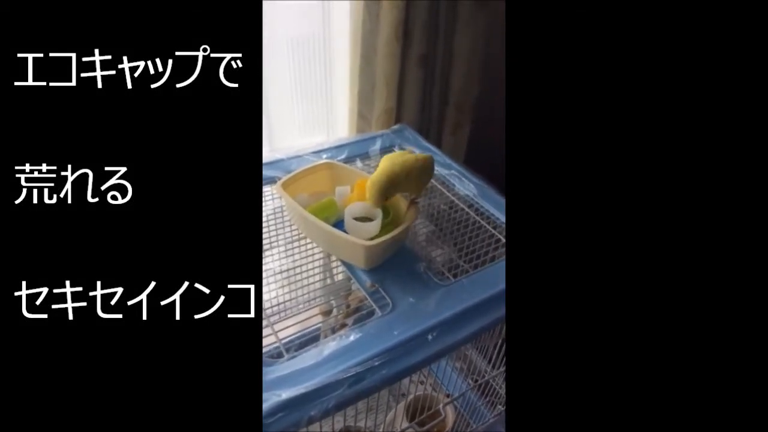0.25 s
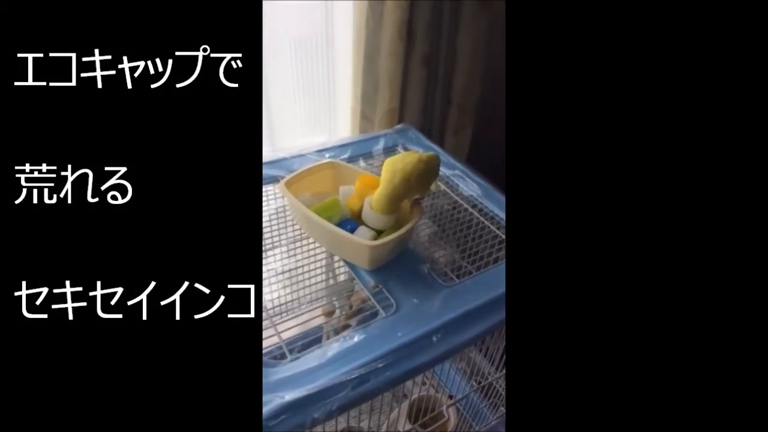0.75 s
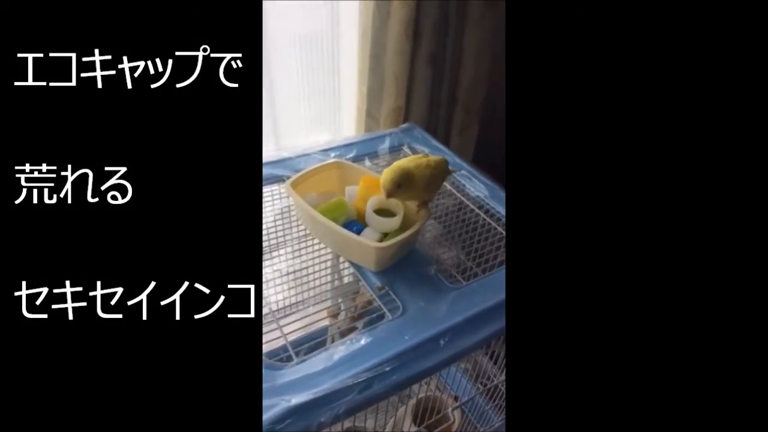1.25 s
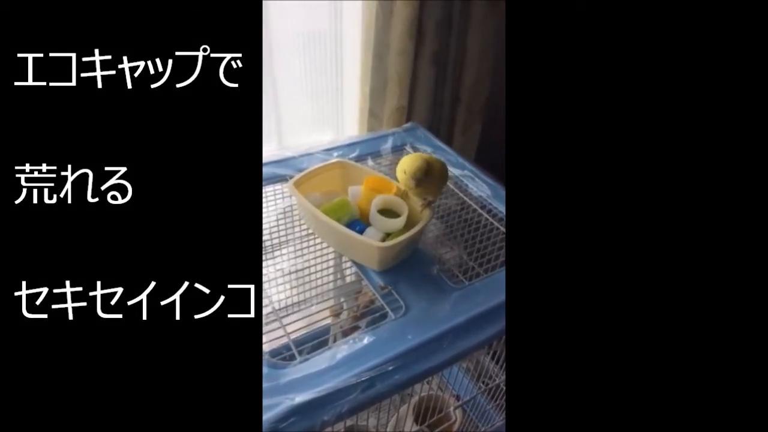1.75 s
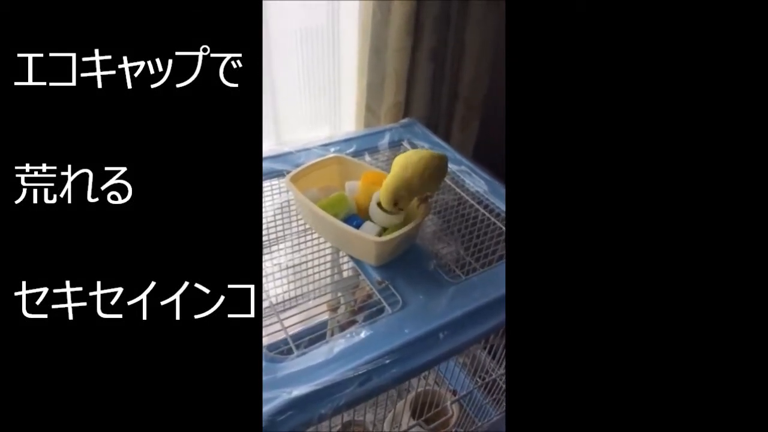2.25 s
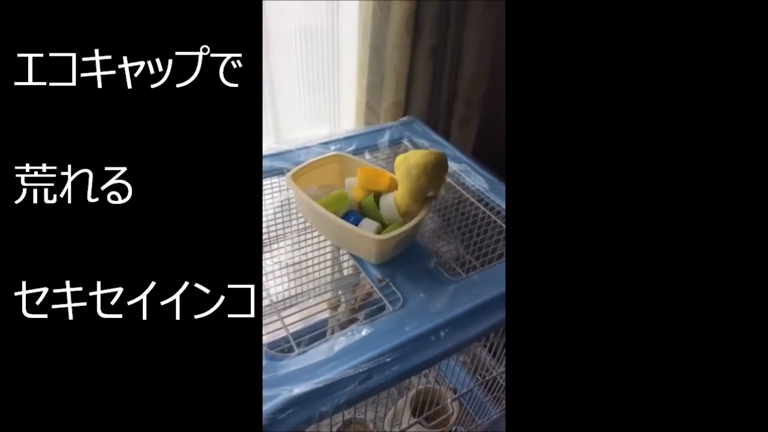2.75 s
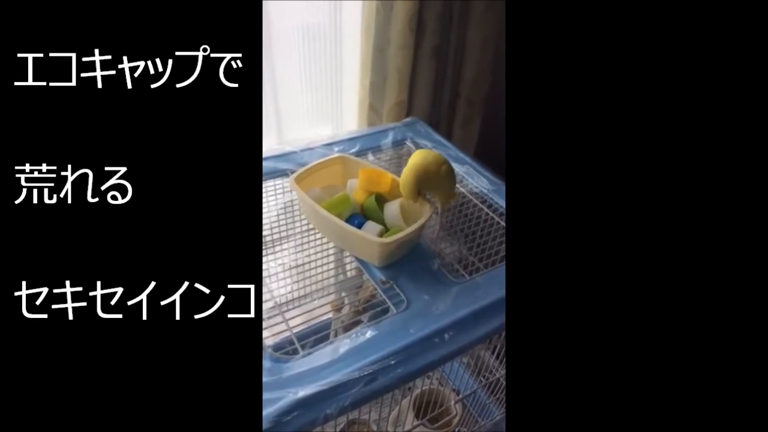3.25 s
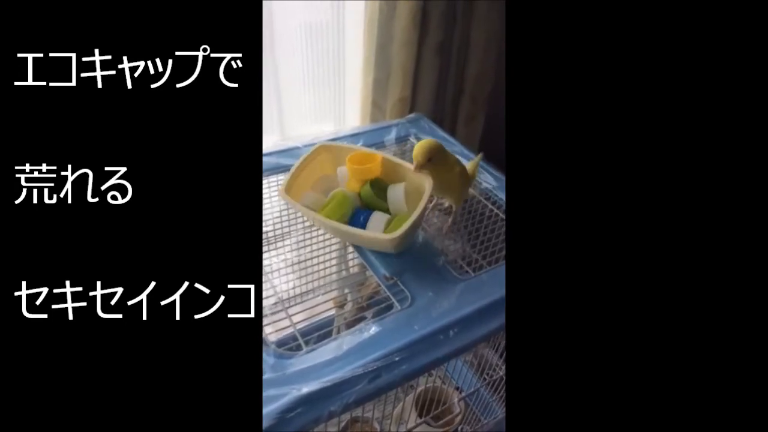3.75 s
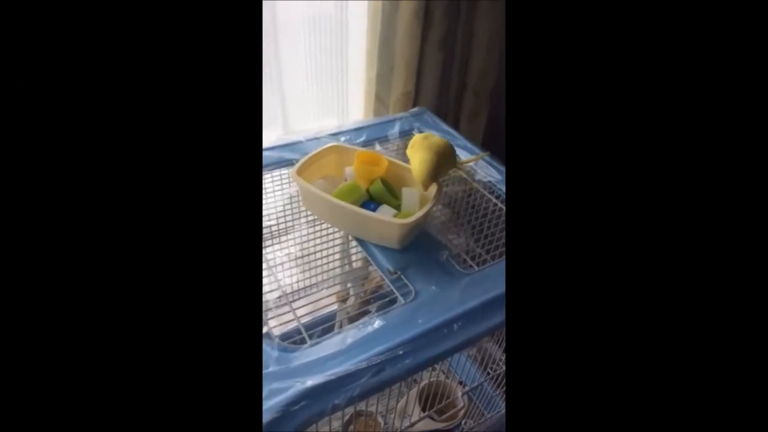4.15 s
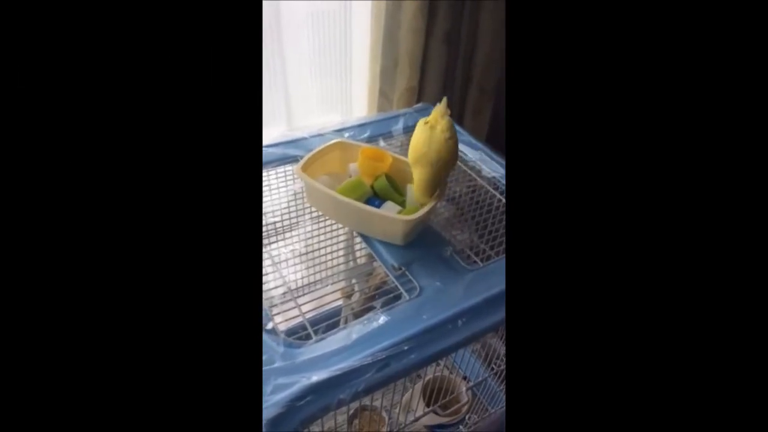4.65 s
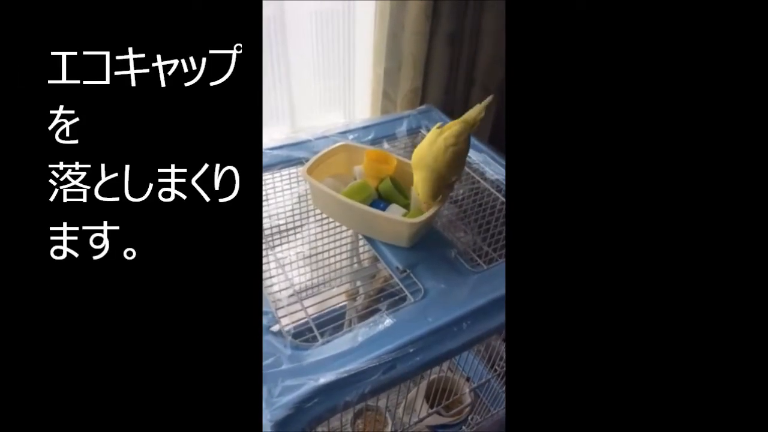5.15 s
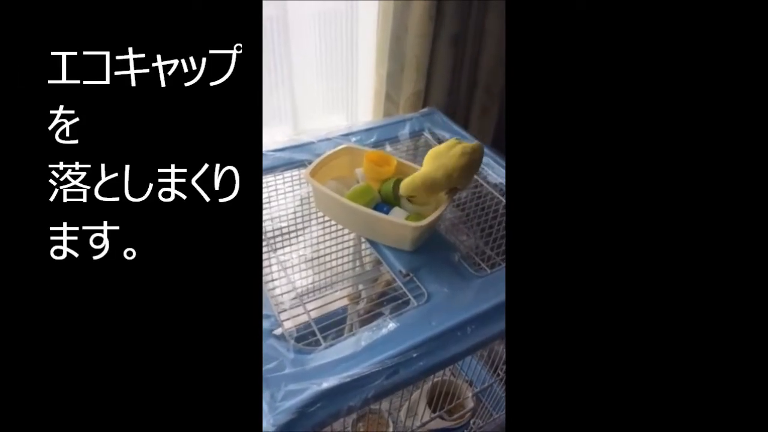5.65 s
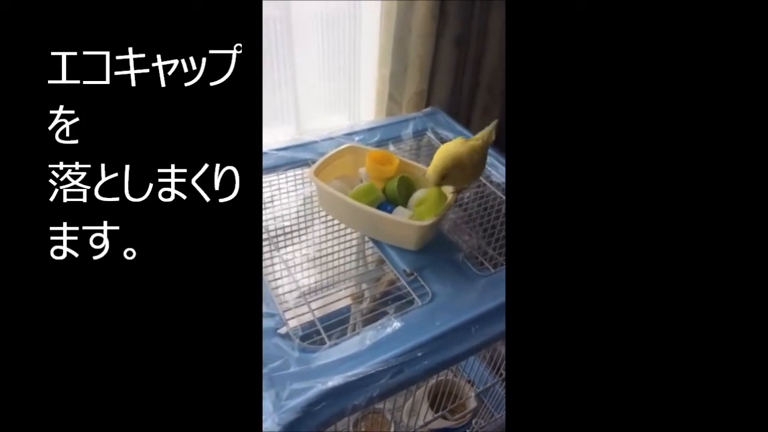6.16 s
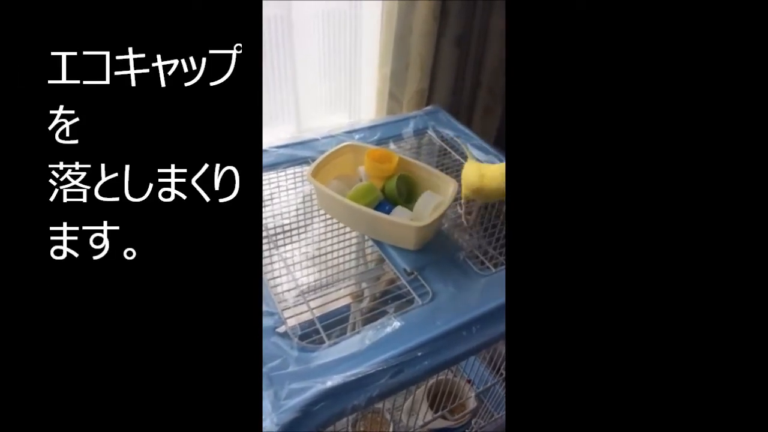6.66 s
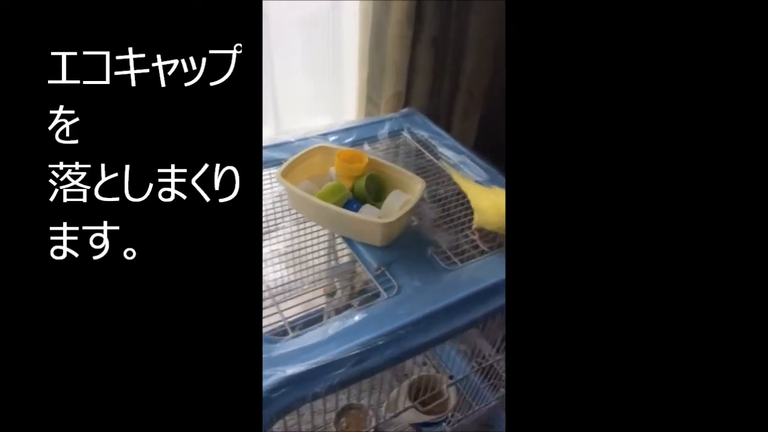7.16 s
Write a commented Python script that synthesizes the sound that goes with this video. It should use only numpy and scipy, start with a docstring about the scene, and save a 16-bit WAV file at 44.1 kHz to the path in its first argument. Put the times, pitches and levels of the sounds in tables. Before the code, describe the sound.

Hard plastic bottle caps click, rattle and scrape irregularly in a plastic dish on a wire cage as a small bird rummages, in a quiet room.

```python
"""A budgie on the rim of a plastic dish rummages through plastic bottle caps with beak and claws.
Clicks are noise cracks with short cap modes, split into body, edge and tick; sliding caps are streams
of tiny contacts. Tapped crowns pop as resonated noise. The dish, on a wire cage in a small room, knocks
on the cage top in ringing modes. There is one deep bump, and once the wires chatter under the dish.
Random echo paths make the room, and coloured noise its still air."""
import sys
import numpy as np
from scipy import signal
from scipy.fft import rfft, irfft
from scipy.io import wavfile
from scipy.ndimage import uniform_filter1d

SR = 44100
rng = np.random.default_rng(int(sys.argv[2]) if len(sys.argv) > 2 else 0)


def waveform_to_disk(signal):
    """Save audio, clipped to [-1, 1], as 16-bit WAV at the path in sys.argv[1]."""
    frames = np.transpose(np.atleast_2d(signal))
    scaled = np.clip(frames, -1, 1) * 32767
    samples = np.round(scaled).astype(np.int16)
    wavfile.write(sys.argv[1], SR, samples)


N = 325899  # length in samples
TIME = np.arange(N) / SR

# Levels in these tables are relative: layer gains and random variation are added later.
# The clearest contacts of beak, claws, caps and dish.
# Each row: start in seconds, strength in dB, body pitch in Hz, hardness in dB.
CONTACTS = [(0.143, -23.5, 1080, -5.5), (0.164, -41, 1450, -4.5), (0.455, -78.5, 1170, 13.5),
            (0.524, -66, 805, 2.5), (0.626, -29.5, 1020, -5.5), (0.636, -37, 1080, -2),
            (0.642, -40, 770, -2.5), (0.921, -51, 1950, -13), (1.036, -43.5, 1080, -14.5),
            (1.104, -48.5, 1120, -11.5), (1.615, -64, 1650, -3), (1.709, -52.5, 1550, -15),
            (1.721, -54.5, 2110, -1), (1.751, -50.5, 2450, -2), (2.358, -49, 880, -14),
            (2.562, -39, 1120, -7), (2.658, -49, 1580, -6.5), (2.802, -44, 1700, -14),
            (2.825, -43.5, 1180, -16), (2.93, -52.5, 1710, -19), (3.019, -53.5, 1570, -3.5),
            (3.063, -44, 1720, -2), (3.124, -52.5, 1900, 4), (3.155, -51.5, 1660, -8),
            (3.429, -48.5, 1290, -3.5), (3.456, -58, 1150, 3.5), (3.712, -44.5, 1314, -5.5),
            (3.932, -35, 870, -3.5), (3.949, -25.5, 1640, -6), (3.958, -33, 1440, -2),
            (3.971, -31.5, 1600, -2.5), (3.987, -34, 1490, -2.5), (4.011, -33, 1710, -8.5),
            (4.057, -38.5, 1360, -8), (4.085, -61, 1250, 13.5), (4.111, -36.5, 1210, -5),
            (4.183, -45.5, 955, -29), (4.297, -45, 1870, 2), (4.324, -44, 1420, -21),
            (4.427, -63.5, 1520, 7.5), (4.735, -65.5, 1630, 1), (4.913, -47.5, 1520, -8),
            (4.981, -64, 1550, 5), (5.064, -56, 1170, -9.5), (5.119, -58.5, 1100, -9.5),
            (5.194, -64, 1500, 1), (5.256, -60, 1170, -5), (5.353, -38.5, 1890, -8),
            (5.659, -44.5, 1130, -20), (5.686, -44, 1220, -4.5), (5.808, -41, 1670, -8),
            (5.897, -40.5, 1670, -10.5), (5.921, -34, 920, -1), (5.988, -33.5, 1280, -9.5),
            (6.245, -34, 930, -9), (6.514, -60, 1400, 3), (6.552, -48.5, 1570, 2.5),
            (6.636, -44, 1540, -19), (6.76, -54.5, 1410, -1), (6.801, -48.5, 1450, -0.5),
            (6.982, -54, 1480, 0), (7.095, -55, 1360, -0.5), (7.258, -31.5, 1510, -1.5),
            (7.266, -31.5, 680, -27), (7.291, -36.5, 960, -4.5)]
# The dish drops back on the cage top.
# Each row: start in seconds, thud level in dB, lowest pitch it stirs in Hz, wire ring level in dB.
DISH_DROPS = [(0.145, -46, 198, -63), (0.627, -45, 230, -51), (3.949, -38.5, 160, -37.5),
              (3.974, -38.5, 140, -52), (4.012, -39, 136, -47), (5.921, -35, 220, -62),
              (6.210, -35, 108, -34.5), (6.245, -41, 127, -33), (7.259, -34.5, 320, -34)]
# A cap tapped on its crown pops at the pitch of its hollow.
# Each row: start in seconds, pitch in Hz, level in dB.
CROWN_TAPS = [(0.048, 3500, -68), (0.617, 2520, -33), (0.92, 2760, -53), (1.721, 2830, -44.5),
              (1.752, 2970, -45.5), (3.933, 3240, -29)]
# The bird shoves a cap across the others.
# Each row: start in seconds, length in seconds, strength in dB, scratchiness in dB.
CAP_SHOVES = [(0, 0.023, -51.5, 1.5), (0.125, .03, -56, 0), (0.603, 0.058, -44.5, -13),
              (0.687, 0.061, -52.5, -13), (0.808, 0.057, -58, -12), (0.93, .18, -55, -20),
              (2.759, 0.11, -54.5, -12.5), (3.42, 0.062, -57, -7), (3.897, 0.079, -45, 0.5),
              (3.947, .18, -39.5, -9.5), (5.356, 0.06, -48, -10), (5.647, 0.075, -45.5, -8.5),
              (5.806, 0.021, -41.5, -12.5), (5.887, 0.1196, -41.5, -17), (6.634, 0.03, -54.5, 4.5),
              (7.237, .09, -49.5, 2)]
# How busily the bird stirs the caps and scratches with its claws.
# Each row: time in seconds, stirring effort in dB, scratching effort in dB.
BUSYNESS = [(0, -54.5, -66), (0.38, -61, -74.5), (0.5, -71, -79), (0.8, -65, -69.5), (1.02, -59.5, -70),
            (1.31, -58.5, -77.5), (1.36, -80, -86.5), (2.28, -81, -87), (2.35, -58, -69.5),
            (3.08, -60, -67), (3.28, -68, -69.5), (3.85, -61.5, -62), (4.5, -75, -79.5),
            (5.3, -70.5, -73.5), (5.45, -63, -69.5), (6.1, -59.5, -67.5), (6.75, -59.5, -62),
            (6.97, -77.5, -76)]
# Modes of the caps in the dish. Each row: pitch in Hz, level in dB, t60 in seconds.
CAP_MODES = [(641, -2.5, 0.067), (810, 1.5, 0.05), (1023, -14, 0.016), (1230, 0, 0.041), (1634, 5, 0.02),
             (1850, -11.5, 0.061), (2058, 3.5, 0.031), (3060, -42, 0.015), (3472, -1.5, 0.074),
             (3917, 13, 0.014), (4510, -1.5, 0.069), (5800, 14, 0.0042), (6850, -13, 0.01),
             (8340, 8, 0.013), (10200, -15, 0.0042), (11300, -3, .007)]
# Modes of the dish on the cage top. Each row: pitch in Hz, level in dB, t60 in seconds.
DISH_MODES = [(145.3, -13, 0.48), (181.6, -12, 0.52), (230.7, -13, 0.15), (270, -9, 0.17), (344, -7.5, 0.3),
              (433, -15, 0.11), (562, -3, 0.11), (625, 6.5, 0.019), (790, 2, 0.089)]
# Modes of the cage wires. Each row: pitch in Hz, level in dB, t60 in seconds.
WIRE_MODES = [(1713, -1.5, 0.052), (2150, -36, 0.088), (3155, 1.5, 0.19), (3350, -27.5, 0.15),
              (4620, 4, 0.18), (5230, -10, 0.15), (6220, 1, 0.17), (7440, -16, 0.084), (7570, 15, 0.11),
              (9160, 2, 0.16), (11400, 0, .11)]
# Colour of the crack at each contact. Each row: frequency in Hz, level in dB.
CRACK_COLOUR = [(100, 2), (400, 1), (800, -5), (1900, -5.5), (2600, -5), (4500, -7), (8000, -6.5),
                (11000, -11), (15500, -19)]
# Colour of wire striking wire. Each row: frequency in Hz, level in dB.
BUZZ_COLOUR = [(300, 2), (800, 6), (2000, -0.5), (4500, 3), (8000, -1.5), (9800, -5.5), (11500, -5),
               (12800, -17), (15500, -18)]
# Colour of the still room air. Each row: frequency in Hz, relative density in dB per Hz.
AIR_COLOUR = [(22, -32), (55, -3), (90, 1), (170, -4.5), (270, -3), (550, -11), (1400, -24.5),
              (2100, -24.5), (3000, -29.5), (6000, -29.5), (8500, -26.5), (14500, -35)]
# Decay of the room tail. Each row: frequency in Hz, t60 in seconds.
ROOM_DECAY = [(200, 0.86), (600, 0.33), (1400, 0.32), (3700, 0.33), (8000, 0.31), (14000, 0.25)]

# upper edges of the hollow body, of the hard edge and of the whole sound
BODY_TOP_HZ, EDGE_TOP_HZ, CUTOFF_HZ = 2500, 6000, 15550
# a harder contact is brighter: dB gained per dB of hardness, and level in dB at hardness 0
EDGE_PER_DB, EDGE_DB = 1.12, 0.04
TICK_PER_DB, TICK_DB = 1.48, -0.9
# sliding, claw scratches and light pecks, in dB above the bird's effort
SLIDE_DB, SCRATCH_DB, PECK_DB = -1.27, 0.56, -3
SLIDE_HZ = 1280  # hollow pitch of sliding caps
# the dish skids: a quick build-up while it slides, then a drop and a dying rattle
SKID_AT_S, SKID_S, SKID_RISE_S, SKID_DB = 6.195, 0.045, 0.03, -30
RATTLE_DB, RATTLE_T60 = -5, 0.48
CHATTER_S = .25  # skid and rattle together
AIR_DB = -65.5
LEVEL_SAMPLES = 265  # a blow is levelled on its first 6 ms


def amp(db):
    """Decibels to gain."""
    return 10 ** (np.asarray(db) / 20)


def unit(x, count=None):
    """Scales to rms 1, judged on the first count samples."""
    return x / np.sqrt(np.mean(x[:count] ** 2) + 1e-20)


def read(points, hz):
    """Reads a table on a log-frequency axis."""
    f, value = np.transpose(points)
    return np.interp(np.log(hz + 1), np.log(f), value)


def add(mix, s, sound):
    """Mixes a sound in at time s."""
    part = mix[max(round(s * SR), 0):][:len(sound)]
    part += sound[:len(part)]


def noise(spectrum, size):
    """Noise of a given colour, rms 1."""
    white = rfft(rng.standard_normal(size))
    gain = amp(read(spectrum, np.fft.rfftfreq(size, 1 / SR)))
    return unit(irfft(white * gain, size))


def band(x, hz, kind):
    """Causal low-, high- or band-pass."""
    return signal.sosfilt(signal.butter(4, hz, kind, fs=SR, output="sos"), x)


def resonance(x, hz, q):
    """A broad hollow resonance."""
    return signal.lfilter(*signal.iirpeak(hz, max(q, .5), fs=SR), x)


def fade(t, t60):
    """Falls 60 dB in t60 seconds."""
    return np.exp(-np.log(1000) * t / np.maximum(t60, 1e-3))


def ring(modes, size, detune, uneven_db):
    """One blow: where it lands decides how strongly each mode speaks, and shifts it a little."""
    hz, db, t60 = np.transpose(modes)[:, :, None]
    shift, strength, side = rng.standard_normal((3, len(modes), 1))
    t = np.arange(size) / SR
    level = np.sign(side) * amp(db + uneven_db * strength)
    tone = np.sin(2 * np.pi * hz * np.exp(detune * shift) * t)
    return (level * fade(t, t60) * tone).sum(0)


def grains(per_s, spread_db, size=N):
    """A random train of tiny impulses of uneven size."""
    height = amp(spread_db * np.minimum(rng.exponential(1, size), 3.5))
    sign = rng.choice([-1, 1], size)
    return height * sign * (rng.random(size) < per_s / SR)


def still_air():
    """Still room air: steady coloured noise."""
    return amp(AIR_DB) * noise(AIR_COLOUR, size=N)


def effort(s, column=1):
    """How busy the bird is at time s, in dB: stirring (column 1) or scratching (column 2)."""
    curve = np.transpose(BUSYNESS)
    return np.interp(s, curve[0], curve[column])


def contact(crack_db=1, crack_t60=0.016, rattle_db=-19, rattle_t60=0.17,
            skip_db=-7, skip_s=.003, count=2):
    """A crack, the short ring of a cap and a shiver of its neighbours; the edge skips as it lands."""
    size = 3072
    t = np.arange(size) / SR
    crack = noise(CRACK_COLOUR, size) * (fade(t, crack_t60) + amp(rattle_db) * fade(t, rattle_t60))
    cap = unit(ring(CAP_MODES, size, detune=0.06, uneven_db=2.5), LEVEL_SAMPLES)
    blow = cap + amp(crack_db) * unit(crack, LEVEL_SAMPLES)
    out = blow.copy()
    for delay, strength in rng.random((count, 2)):
        add(out, delay * skip_s, amp(skip_db) * strength * blow)
    # plastic gives a little before it bites
    return out * (1 - fade(t, .003))


def shuffles(lurch_db=7.0, body_q=1.0, count=8):
    """Sliding caps stick and slip: streams of tiny contacts follow the effort and swell at each shove."""
    slips, scratches = np.zeros((2, N))
    for _ in range(count):
        cap = contact()
        # each cap lurches in its own time
        drift = uniform_filter1d(uniform_filter1d(rng.standard_normal(N), 900), 900)
        lurch = amp(lurch_db * np.clip(unit(drift), -2, 2))
        slips += signal.oaconvolve(lurch * grains(per_s=55, spread_db=3.5), cap)[:N]
        scratches += signal.oaconvolve(lurch * grains(per_s=35, spread_db=2.2), cap)[:N]
    hollow = band(slips + scratches, [560, 3000], "band")
    slips = unit(resonance(hollow, SLIDE_HZ, body_q))
    scratches = unit(band(scratches, BODY_TOP_HZ, "high"))
    out = amp(effort(TIME) + SLIDE_DB) * slips
    out += amp(effort(TIME, column=2) + SCRATCH_DB) * scratches
    for start, length, db, scratch_db in CAP_SHOVES:
        span = slice(max(round(start * SR), 0), round((start + max(length, .01)) * SR))
        stroke = amp(db) * (unit(slips[span]) + amp(scratch_db) * unit(scratches[span]))
        add(out, start, stroke * signal.windows.tukey(len(stroke), .25))
    return out


def pecks(spread_db=5.5, pitch_hz=1400, hardness_db=-3, hardness_spread_db=3.5, count=44):
    """Light pecks and steps at chance moments, stronger when the bird is busy; rows like CONTACTS."""
    s = (np.arange(count) + rng.random(count)) / count * N / SR
    strength, pitch, hardness = np.clip(rng.standard_normal((count, 3)), -2, 2).T
    # more scratching makes for harder contacts
    claws_db = (effort(s, column=2) - effort(s)) / 2
    body_db = effort(s) + PECK_DB + spread_db * strength
    body_hz = pitch_hz * np.exp(.17 * pitch)
    return list(zip(s, body_db, body_hz, hardness_db + claws_db + hardness_spread_db * hardness))


def clicks(body_q=2.0, wide_db=-13, low_hz=230, snap_db=6, settle_db=-19, settle_s=0.044, count=3):
    """Contacts of hollow body, hard edge and fine tick settle in faint bounces; direct and room sends."""
    direct, spread = np.zeros((2, N))
    for s, body_db, body_hz, hardness_db in list(CONTACTS) + pecks():
        edge_db = body_db + EDGE_DB + EDGE_PER_DB * hardness_db
        tick_db = body_db + TICK_DB + TICK_PER_DB * hardness_db
        blow = contact()
        # the treble gets a boost in the first instant of contact
        snap = blow * (1 + amp(snap_db) * fade(TIME[:len(blow)], .006))
        hollow = resonance(blow, body_hz, body_q) + amp(wide_db) * blow
        body = band(hollow, [low_hz, BODY_TOP_HZ], "band")
        edge = band(snap, [BODY_TOP_HZ, EDGE_TOP_HZ], "band")
        tick = band(snap, EDGE_TOP_HZ, "high")
        click = amp(body_db) * unit(body, LEVEL_SAMPLES)
        click += amp(edge_db) * unit(edge, LEVEL_SAMPLES)
        click += amp(tick_db) * unit(tick, LEVEL_SAMPLES)
        add(direct, s, click)
        for delay in rng.random(count):
            add(direct, s + delay * settle_s, amp(settle_db) * (1 - delay) * click)
        # a heavy blow shakes the whole dish and fills the room; a light peck is drier
        room_db = np.interp(body_db, [-42, -28], [-3.5, .5])
        add(spread, s, amp(room_db) * click)
    return direct, spread


def pops(q=3.8, t60=0.042, after_db=-16, after_t60=0.33):
    """The hollow of a cap sounds briefly and hangs in the air: fading noise through two resonances."""
    out, t = np.zeros(N), np.arange(SR // 4) / SR
    for s, hz, db in CROWN_TAPS:
        push = rng.standard_normal(len(t)) * (fade(t, t60) + amp(after_db) * fade(t, after_t60))
        hollow = resonance(resonance(push, hz, q), hz, q)
        add(out, s, amp(db) * unit(hollow, LEVEL_SAMPLES))
    return out


def knocks(count=4):
    """The rocking dish thuds on the cage top and sets a few wires ringing."""
    out = np.zeros(N)
    for s, thud_db, low_hz, wire_db in DISH_DROPS:
        thud = band(ring(DISH_MODES, size=16384, detune=0.044, uneven_db=0.5), low_hz, "high")
        wires = sum(ring(WIRE_MODES, size=8192, detune=.03, uneven_db=2) for _ in range(count))
        # both are levelled on their first 20 ms
        add(out, s, amp(thud_db) * unit(thud, count=882))
        add(out, s, amp(wire_db) * unit(wires, count=882))
    return out


def bump(db=-53):
    """One soft, deep bump: low noise under a bell-shaped swell."""
    swell = np.exp(-((TIME - 3.567) / .033) ** 2)  # centre and width in seconds
    rumble = swell * band(rng.standard_normal(N), [45, 80], "band")
    return amp(db) * rumble * np.linalg.norm(swell) / np.linalg.norm(rumble)


def chatter(ring_db=-8, buzz_db=0.0, buzz_t60=0.033, count=24):
    """Many unlike wires strike one another over and over: a bright buzz that rings on."""
    t = np.arange(0, CHATTER_S, 1 / SR)
    build_up = np.minimum(t / SKID_RISE_S, 1)
    rattle = amp(RATTLE_DB) * fade(t - SKID_S, RATTLE_T60)
    force = amp(SKID_DB) * np.where(t < SKID_S, build_up, rattle)
    out = np.zeros(N)
    for _ in range(count):
        wire = ring(WIRE_MODES, size=8192, detune=.045, uneven_db=4)
        buzz = noise(BUZZ_COLOUR, size=len(wire)) * fade(TIME[:len(wire)], buzz_t60)
        blows = force * unit(grains(per_s=45, spread_db=-2.5, size=len(force))) / np.sqrt(count)
        strike = amp(ring_db) * wire / np.linalg.norm(wire)
        strike += amp(buzz_db) * buzz / np.linalg.norm(buzz)
        add(out, SKID_AT_S, signal.fftconvolve(blows, band(strike, 360, "high")))
    return out


def echo(early_db=-15, early_t60=0.071, tail_db=-11):
    """Quick reflections from the cage top and window, and the tail of a small room."""
    t = np.arange(SR // 2) / SR
    taps = rng.standard_normal(len(t)) * (rng.random(len(t)) < .1) * (t > .007)
    # each frequency of the tail dies at its own rate
    hz, frames, z = signal.stft(taps, SR, nperseg=256)
    decay = fade(frames, read(ROOM_DECAY, hz)[:, None])
    tail = signal.istft(z * decay, SR, nperseg=256)[1][:len(t)]
    early = rng.standard_normal(len(t)) * (rng.random(len(t)) < .03) * (t > .002)
    early = early * fade(t, early_t60)
    return amp(tail_db) * tail / np.linalg.norm(tail) + amp(early_db) * early / np.linalg.norm(early)


def room(x, count=6):
    """Each contact radiates its own way, so the sound is handed round several different echo paths."""
    out = np.zeros(N)
    place = TIME * 70  # paths handed on per second
    for k in range(count):
        away = abs((place - k) % count - count / 2)
        share = np.cos(np.pi / 2 * np.minimum(away, 1))
        out += signal.oaconvolve(x * share, echo())[:N]
    return out


def scene():
    """Caps, dish and cage in the quiet room."""
    direct, spread = clicks()
    rest = amp(-3.5) * pops() + amp(-2.5) * shuffles() + amp(-2.5) * knocks() + amp(0.5) * chatter()
    mix = direct + rest + room(spread + rest) + bump() + still_air()
    return mix[None]


def record(dry):
    """Limits the top of the band with a steep linear-phase low-pass."""
    low_pass = signal.firwin(301, CUTOFF_HZ, window=("kaiser", 8), fs=SR)
    return signal.oaconvolve(dry, low_pass[None], "same")


dry = scene()
out = record(dry)
waveform_to_disk(out)
```